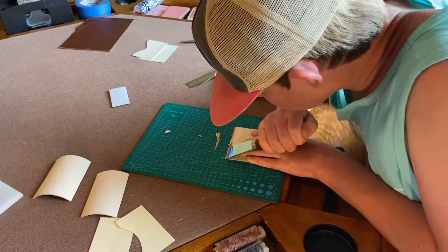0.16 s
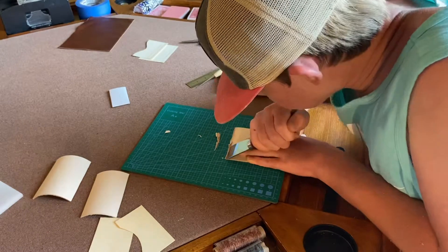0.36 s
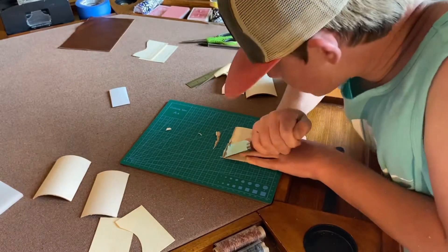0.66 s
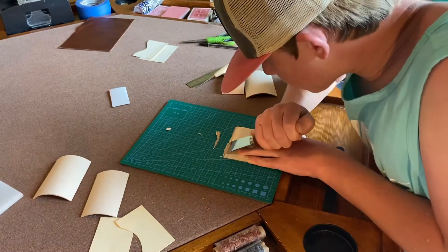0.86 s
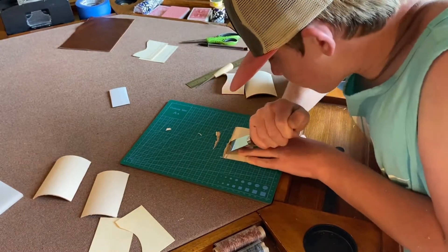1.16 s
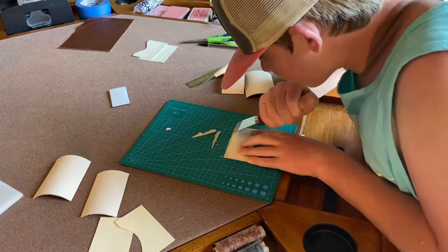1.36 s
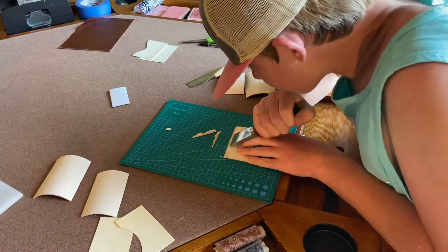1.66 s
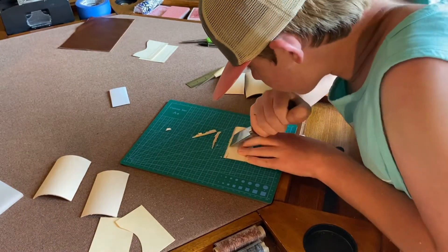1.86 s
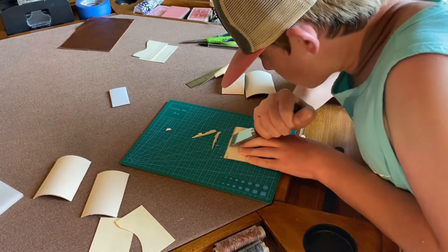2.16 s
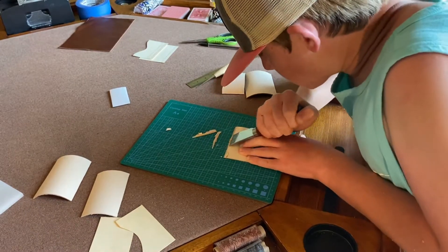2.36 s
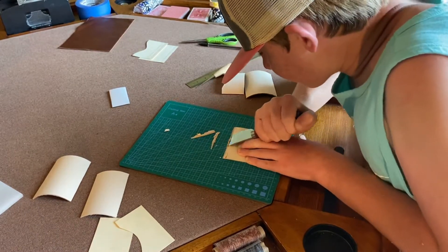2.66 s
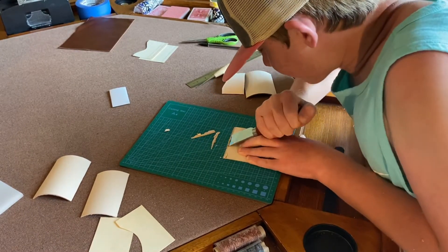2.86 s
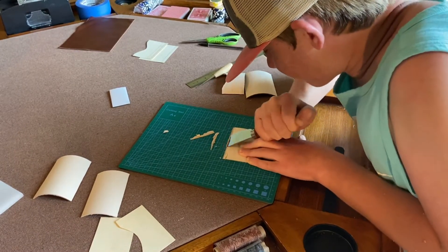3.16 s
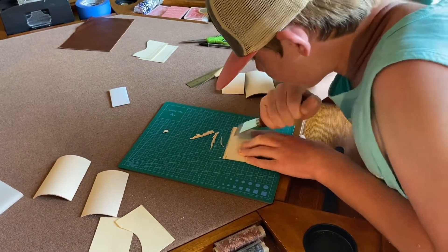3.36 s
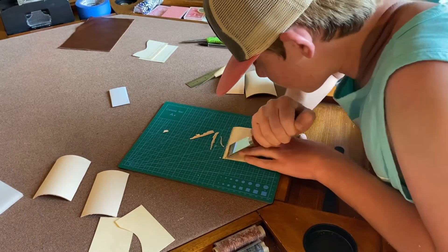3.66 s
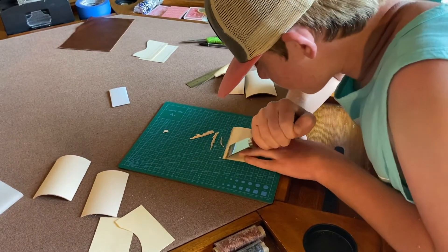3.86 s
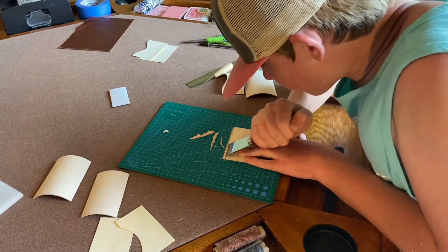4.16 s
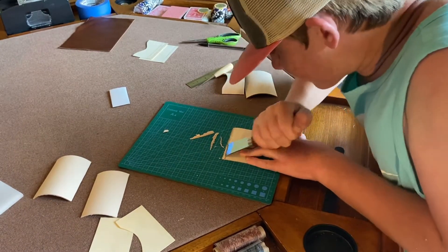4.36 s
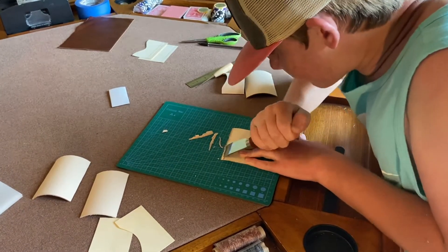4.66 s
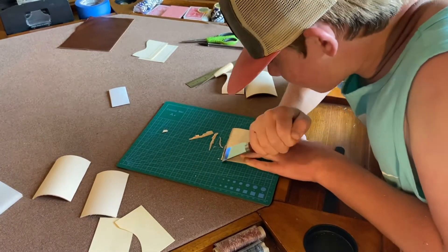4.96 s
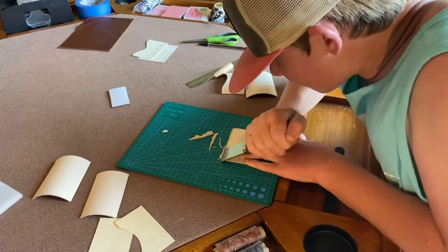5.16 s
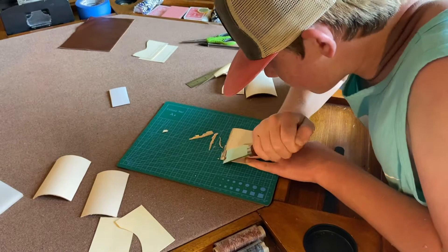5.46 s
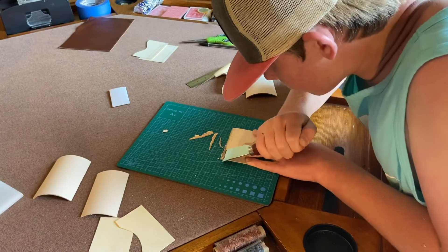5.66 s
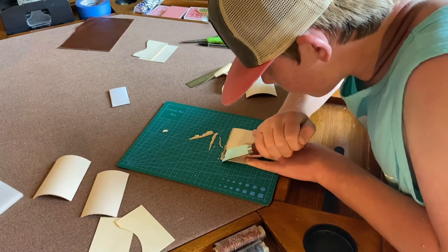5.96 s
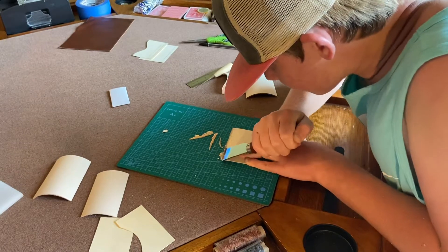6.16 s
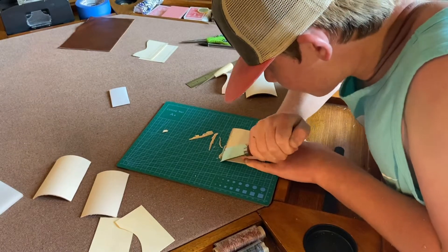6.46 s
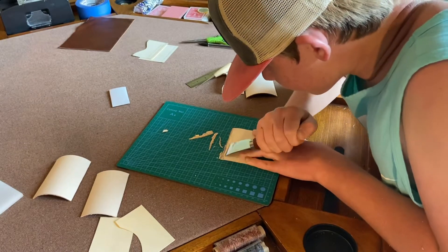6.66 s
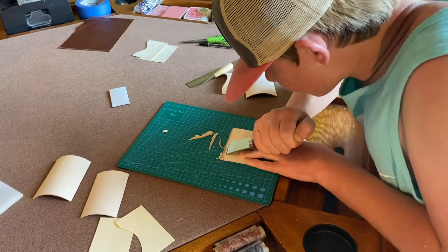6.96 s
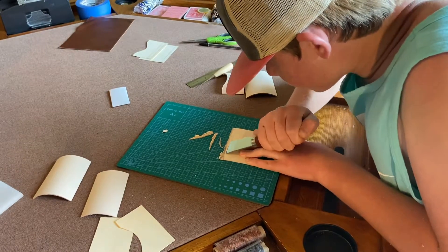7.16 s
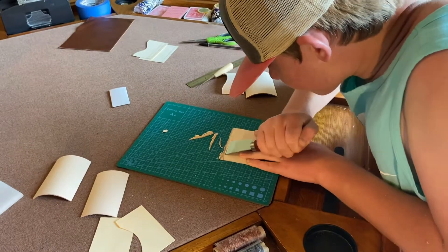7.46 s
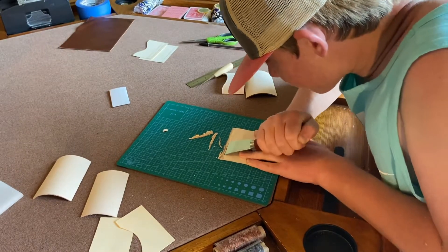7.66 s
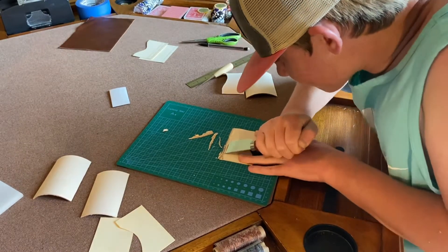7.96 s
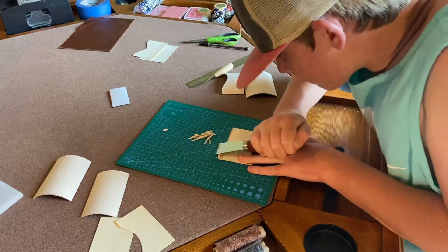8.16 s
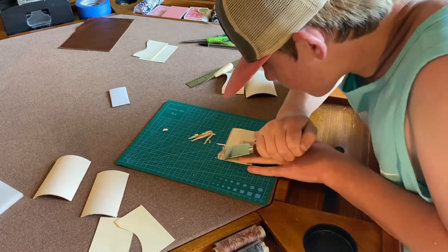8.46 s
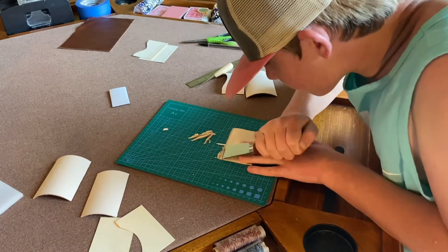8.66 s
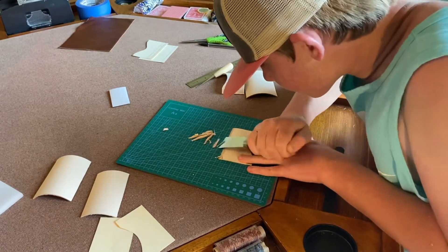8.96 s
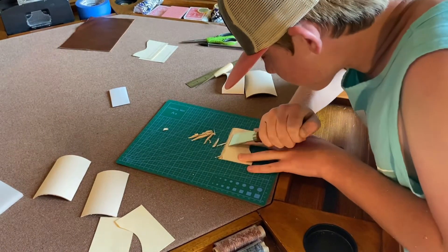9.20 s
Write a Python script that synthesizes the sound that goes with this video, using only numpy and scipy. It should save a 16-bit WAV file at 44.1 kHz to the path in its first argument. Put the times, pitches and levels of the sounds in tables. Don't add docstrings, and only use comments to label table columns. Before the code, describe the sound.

Stuttering scrapes of a blade through leather, small ticks, dull board knocks and a hard clack, over quiet room ventilation hum.

```python
import sys
import numpy as np
from scipy import signal
from scipy.fft import rfft, irfft, next_fast_len
from scipy.io import wavfile
from scipy.ndimage import uniform_filter1d

SR = 44100
rng = np.random.default_rng(int(sys.argv[2]) if len(sys.argv) > 2 else 0)


def to_linear_factor(level_db):
    exponent = np.asarray(level_db, float) / 20
    return 10 ** exponent


def generate_wav(signal):
    frames = np.transpose(np.atleast_2d(signal))
    scaled = np.clip(frames, -1, 1) * 32767
    pcm = np.round(scaled).astype(np.int16)
    wavfile.write(sys.argv[1], SR, pcm)


N = 411453
T = np.arange(N) / SR
FAST = next_fast_len(N, True)
HZ = np.maximum(np.fft.rfftfreq(FAST, 1 / SR), 10)

# frequency in Hz, level in dB per Hz.
AIR_COLOUR = [(18, -48), (30, -32), (165, 0), (226, -2), (279, -5), (447, -2.5), (716, -5.5), (795, -13),
              (883, -11), (1570, -16), (2520, -17.5), (4040, -27), (8420, -34), (12500, -42.5),
              (14600, -48.5), (15800, -50)]
# frequency in Hz, width in Hz, lift in dB
HUM_PEAKS_DIPS = [(91, 12.5, 6.5), (163.2, 14.6, 4), (214, 24, 7), (281, 25, -3.5), (356, 69, 5.5),
                  (451.7, 33.4, 7.5), (596, 23, 3.5), (892, 17, 4.5), (2600, 300, 2.5), (3050, 350, -3.5),
                  (4100, 200, -5)]
# frequency in Hz, left minus right in dB.
AIR_SIDE = [(200, 0.1), (290, 3), (380, 6), (520, 2), (700, 0.1)]
AIR_DB = -48.5

# start in seconds, hardest in seconds, end in seconds, lift of the drag in dB.
STROKES = [
    (.35, 0.648, 0.74, 2.5),
    (.8, 1.05, 1.3, 3),
    (2.2, 2.66, 2.91, 8.2),
    (2.9, 3.07, 3.15, 8),
    (3.0, 3.22, 3.57, 9.5),
    (3.9, 4.54, 4.78, 8.6),
    (4.9, 5.33, 5.55, 5),
    (5.7, 6.0, 6.2, 2),
    (6.25, 6.47, 6.68, 2),
]
# frequency in Hz, level in dB per Hz.
CUT_COLOUR = [(300, -26), (900, 3), (2500, -8), (5000, -15.5), (12000, -29.5)]
# frequency in Hz, level in dB per Hz.
RUSTLE_COLOUR = [(3000, -18), (7000, -5.5), (10000, -7.5), (15500, -6.5)]
# time in seconds, level in dB.
FIDGET = [(0, -75), (.34, -86), (.62, -74), (.85, -84), (2.28, -90), (2.44, -74), (2.65, -84), (3.03, -91),
          (3.17, -69.5), (3.45, -79.5), (3.95, -72.5), (4.26, -81), (4.48, -72), (6.4, -75), (7.0, -79),
          (8.8, -85), (9.02, -75), (9.33, -83)]
FAINT_FLOOR_DB, RASP_TOP_HZ = -59, 5500
RUSTLE_FOLLOWS = 0.57

# start in seconds, level in dB, rise in seconds, t60 in seconds.
FLICKS = [
    (7.4745, -52, 0.0011, 0.05),
    (8.848, -64, .001, 0.026),
    (0.151, -71, .01, 0.054),
    (4.9, -67, 0.011, 0.1),
]
# time in seconds, peak in
# dB, centre in Hz, dull pluck in dB.
TICKS = [(1.0156, -45, 4830, -43), (3.3882, -48, 4410, -58), (4.2283, -44, 4120, -55),
         (4.5451, -38, 5760, -46), (4.9048, -42, 4910, -58), (5.0464, -41, 4170, -46),
         (5.1103, -42, 5620, -40), (6.976, -44, 4340, -54), (7.1394, -59, 9080, -60),
         (7.656, -58, 8500, -62), (8.0311, -50, 5120, -46), (8.0739, -35, 10700, -44),
         (8.3294, -48, 8580, -61), (8.8478, -50, 11200, -65), (8.0742, -36, 15200, -60),
         (8.0742, -38, 6800, -60), (8.9012, -42, 8700, -55), (8.8672, -35, 9960, -47)]
# time in seconds, bright tick in dB, dull pluck in dB.
SPRINGS = [(2.3984, -53, -46), (2.4693, -45, -49), (2.5426, -50, -41), (2.601, -53, -43),
           (2.6584, -50, -44), (2.7207, -49, -39), (2.7741, -55, -55), (3.0974, -48, -42),
           (3.2091, -48, -35), (4.34, -44, -44), (4.4134, -51, -52), (4.4644, -42, -49), (4.5294, -47, -46),
           (4.5964, -59, -45), (4.6568, -38, -51)]
# frequency in Hz, level in dB per Hz.
FIZZ_COLOUR = [(2500, -20), (4500, -2), (8500, 0), (12000, -7), (15500, -14)]
SPRING_HZ = 9200

# time in seconds, peak in dB, pitch in Hz.
GRAINS = [(0.4469, -49, 1390), (1.1992, -42, 2100), (2.0637, -49, 1530), (2.2934, -43, 1820),
          (2.3254, -43, 1410), (2.3945, -43, 1640), (2.4374, -45, 1250), (2.4668, -43, 1560),
          (2.5032, -43, 1250), (2.5426, -41, 1650), (2.5701, -41, 1250), (2.602, -38, 1250),
          (2.6154, -40, 1290), (2.6838, -34, 1750), (2.6994, -43, 1610), (2.7192, -38, 1600),
          (2.7516, -40, 1360), (3.0041, -39, 1250), (3.0425, -39, 1370), (3.056, -35, 1700),
          (3.0664, -37, 1280), (3.0974, -37, 1570), (3.1218, -29, 1290), (3.1457, -32, 1330),
          (3.1824, -34, 2760), (3.2086, -35, 1580), (4.0886, -48, 1360), (4.1654, -42, 1250),
          (4.3071, -43, 2580), (4.3375, -39, 1570), (4.3755, -43, 1310), (4.4149, -40, 1310),
          (4.4444, -36, 1290), (4.4654, -40, 1640), (4.4854, -39, 2970), (4.5044, -39, 2790),
          (4.5124, -41, 1290), (4.5301, -39, 1330), (4.5625, -38, 1710), (4.5744, -39, 1250),
          (4.596, -37, 1530), (4.6254, -37, 1370), (4.6947, -42, 1340), (5.1816, -43, 1770),
          (5.243, -42, 1270), (5.4889, -47, 1370), (6.3594, -45, 1250), (7.0479, -43, 1320),
          (7.9668, -47, 1800)]

# time in seconds, peak in dB, crack in dB, contact in seconds.
KNOCKS = [(0.5660, -19, -30, 0.0028), (1.146, -30.5, -57, .007), (1.156, -22, -46, 0.0053),
          (3.14, -32, -57, 0.009), (3.18, -31.5, -55, 0.004), (3.24, -30, -58, 0.0015),
          (5.1117, -30.5, -51, 0.0022), (8.068, -36.5, -50, 0.008), (8.8644, -27, -36.5, 0.0037),
          (8.899, -38, -49, .004), (6.36, -43, -62, 0.014), (3.154, -31, -60, .006),
          (3.165, -33, -65, .012)]
# level in dB of the modes in each of the four groups,
# lowest first.
SPOTS = [(0.5, 2, -2.5, -1), (-4, -3, 6, 5), (3, -0.5, 3, 0.5), (1, 0.5, -3, -1), (1, -0.5, -1.5, -3.5),
         (1, 1, -3, -3), (-4.5, 1, 3, 3), (-2, -1, 5, 5.5), (-3, 2, 2, 1), (-2, -1, 1, -2), (5, 1, 2, 3),
         (4, 4, -2, -2), (11, -14, -14, -14)]
GROUP_TOPS_HZ = [220, 580, 950]
# frequency in Hz, width in Hz, level in dB.
BOARD_MODES = [(135, 13, -13.5), (180.4, 21, -6.5), (277, 37, -17), (309, 32, -10), (401, 26, -8),
               (440, 28, 0.5), (535, 30, -9), (635.5, 43, 0.5), (689, 58, -10), (843, 40, -9),
               (886, 39, -12), (1078, 54, -3.5), (1149, 52, -6.5), (1380, 63, -8), (1560, 80, -14.5)]
# frequency in Hz, width in Hz, level in dB.
TAP_MODES = [(1500, 400, 2.5), (2670, 360, 6.5), (5330, 590, -8.5), (9000, 2500, -19.5)]
KNOCK_FLOOR_HZ = 110

# start in seconds, peak in dB, rise in seconds, t60 in seconds,
# squeak of a leather scrap in dB.
BRUSHES = [
    (1.14, -34.5, 0.016, 0.06, -45),
    (1.196, -49, 0.0048, 0.05, -50),
    (3.03, -48, 0.0087, 0.047, -63),
    (8.06, -37.5, 0.017, .09, -50),
    (8.10, -42, .014, 0.028, -44),
    (8.867, -39.5, 0.0017, .08, -52),
    (8.899, -43.5, .004, 0.055, -61),
]
# frequency in Hz, level in dB per Hz.
BRUSH_COLOUR = [(710, -26), (1200, -3), (1770, -17), (2750, -5.5), (3640, -16.5), (3970, -13.5),
                (10800, -19.5), (12200, -28.5), (15800, -15)]
SQUEAK_HZ = 2140

# time in seconds, tear in dB, fibre hiss in dB, tip ring in dB.
SLIPS = [(1.924, -39.5, -59, -76), (2.1624, -44.5, -74, -84), (2.2399, -46, -60, -66),
         (2.3125, -40.5, -60, -59), (2.382, -44, -59, -64), (2.4376, -47, -63, -70),
         (2.5025, -46, -60, -65), (2.5701, -42, -58, -69), (2.6296, -40, -55.5, -57),
         (2.6855, -37.5, -58, -57), (2.7505, -41.5, -61, -60), (3.003, -43, -71, -74),
         (3.058, -35, -66, -69), (3.1198, -31, -50.5, -56), (3.176, -34.5, -47, -57),
         (4.024, -44.5, -74, -84), (4.162, -42.5, -59.5, -80), (4.239, -44, -61, -72),
         (4.3071, -43, -66, -69), (4.3755, -44, -56, -70), (4.4377, -41, -56, -63),
         (4.4844, -39.5, -57.5, -66), (4.5024, -44, -51, -60), (4.5606, -37.5, -51, -59),
         (4.6234, -35, -55, -63), (4.693, -40.5, -68, -80), (5.1816, -40, -62, -73), (5.245, -39, -60, -73),
         (6.3354, -45.5, -59, -77), (7.0404, -45, -65, -78)]
# extra ring of the blade body in dB, delay of the tear in seconds.
BITES = [(0.5, .002), (1, .002), (1, .002), (2, .006), (0.5, .009), (4, .002), (-2, .002), (3, .001),
         (-2, .004), (-2, .001), (0.5, .001), (3, .001), (2, .004), (3, .002), (1, .003), (1, .002),
         (1, .002), (3, .002), (1, .001), (2, .001), (-1, .005), (-3, .006), (-2, .002), (-2, .001),
         (-2, .002), (-3, .003), (-2, .004), (-2, .003), (1, .002), (1, .004)]
# time in seconds, tear in dB, fibre hiss in dB, tip ring in dB.
CATCHES = [
    (2.9744, -50, -70, -80),
    (3.037, -46, -62, -76),
    (5.3103, -45, -68, -79),
    (5.488, -45, -74, -84),
    (6.03, -48, -64, -82),
    (6.972, -48, -70, -84),
    (7.9, -48, -70, -86),
    (7.96, -48, -72, -86),
    (8.485, -48, -68, -86),
]
# frequency in Hz, level in dB per Hz.
LEATHER_COLOUR = [(600, -39), (1000, 5.5), (1600, 2), (3000, -1.5), (4500, -13), (8000, -39)]
# frequency in Hz, level in dB per Hz.
HISS_COLOUR = [(2500, -6), (4000, -2), (7000, -2.5), (9500, -13), (15500, -18)]
# frequency in Hz, width in Hz, level in dB.
TIP_MODES = [(14400, 210, -1.5), (13900, 250, -12)]
# frequency in Hz, width in Hz, level in dB.
STEEL_MODES = [(5730, 120, 8.3), (3290, 160, 8.5), (2160, 90, 7), (2760, 140, 8), (4370, 180, 2),
               (5080, 200, 1), (1700, 120, 2), (6400, 250, -3)]
FIRM_RING_DB, FIRM_TEAR_DB = -62, -42
BODY_DB, BODY_FOLLOWS_TIP, BODY_FOLLOWS_TEAR = -58.5, .5, .4
JERK_T60_S, T60_S_PER_DB = .1, 0.0041

# time in seconds, click in dB, rattle in dB, t60 in seconds.
SNAPS = [
    (3.234, -36.5, -32, 0.094),
    (3.2399, -9, -18.5, 0.06),
    (3.2723, -16.5, -30.5, 0.09),
    (3.2765, -21, -30, 0.068),
    (3.2855, -29, -36.5, 0.055),
    (3.297, -33, -40, 0.055),
    (3.3162, -34, -38, 0.07),
]
# frequency in Hz, level in dB per Hz.
RATTLE_COLOUR = [(290, -35), (500, -12), (545, -16), (931, -6.5), (1520, -6), (1660, 1), (1940, -23),
                 (2450, -1), (3470, -7.5), (3830, -3.5), (4760, -6.5), (5750, -4), (8130, -17),
                 (10400, -29.5), (15800, -26)]
# frequency in Hz, width in Hz, level in dB.
CRACK_MODES = [(1690, 200, -3), (2620, 350, 1.5), (3830, 390, 2), (5580, 550, 0), (7840, 630, -3.5)]

# frequency in Hz, left-right likeness from -1 to 1.
FAR_LIKENESS = [(30, .75), (60, .97), (110, 0.95), (200, 0.97), (380, 0.65), (700, 0.93), (1290, -0.15),
                (2380, -0.35), (4400, -0.48), (8120, 0.59), (15000, 0.18)]
# frequency in Hz, left-right likeness from -1 to 1.
NEAR_LIKENESS = [(130, 0.89), (600, 0.74), (1400, 0.57), (3000, 0.26), (4300, 0.065), (6000, 0.1),
                 (9500, 0.62), (14000, 0.4), (15500, 0.053)]
# frequency in Hz, left minus right in dB.
PORTS = [(60, 1), (110, 2), (200, -0.5), (380, 2.5), (700, 1.5), (1290, 4.0), (2380, 4.5), (4400, 1.5),
         (8120, 3.5), (15000, 7.5)]
# low edge in Hz, high edge in Hz, rarity in spreads of chance,
# changes per second.
DROPOUTS = [(3980, 4160, .9, 12), (4350, 4500, 1.6, 12), (5000, 5170, 1.8, 12), (10050, 10250, 1.3, 12),
            (11600, 11850, 1.6, 12), (13200, 13450, 1.4, 12), (15300, 15800, 1.0, 10),
            (14750, 15300, 1.5, 10)]
ROOM_T60_S, ROOM_DB = 0.12, -12.5
BASS_CUT_HZ, TOP_CUT_HZ = 59, 15760


def rms_one(x):
    return x / np.sqrt(np.mean(x ** 2) + 1e-20)


def at_hz(points):
    hz, value = np.transpose(points)
    return np.interp(np.log(HZ), np.log(hz), value)


def drift(rate_hz):
    r = np.exp(-2 * np.pi * rate_hz / SR)
    slow = signal.lfilter([1], [1, -2 * r, r * r], rng.standard_normal(N + SR))
    return rms_one(slow[SR:])


def noise(colour_db, likeness, pan_db=0):
    mid, side = rfft(rng.standard_normal((2, FAST))) * to_linear_factor(colour_db)
    alike = np.clip(at_hz(likeness), -.99, .99)
    pair = np.sqrt(1 + alike) * mid + np.sqrt(1 - alike) * side * [[1], [-1]]
    pair = pair * to_linear_factor(pan_db * np.array([[.5], [-.5]]))
    pair = irfft(pair, FAST)[:, :N]
    return pair / np.std(pair.mean(axis=0))


def envelope(rows):
    out = np.full(N, 1e-9)
    t = np.arange(SR // 2) / SR
    for s, level_db, rise, t60 in rows:
        rise = max(rise, 1e-4)
        fall_db = -60 * np.maximum(t - rise, 0) / t60
        shape = np.minimum(t / rise, 1) * to_linear_factor(level_db + fall_db)
        at = round(s * SR)
        out[at:at + len(t)] += shape[:N - at]
    return out


def resonate(x, hz, width_hz):
    r = np.exp(-np.pi * width_hz / SR)
    poles = [1, -2 * r * np.cos(2 * np.pi * hz / SR), r * r]
    return signal.lfilter(np.array([1, 0, -1]) * (1 - r * r) / 2, poles, x)


def modes(x, table):
    return sum((-1) ** k * to_linear_factor(mode_db) * resonate(x, hz, width) for k, (hz, width, mode_db) in enumerate(table))


def strikes(times, levels_db, lag):
    clicks = np.full((2, N), 1e-18)
    at = np.round(np.array(times) * SR).astype(int)
    clicks[0, at] = clicks[1, at + lag] = to_linear_factor(np.array(levels_db))
    return clicks


def air_unit():
    modes_db = sum(mode_db / (1 + (2 * (HZ - hz) / width) ** 2) for hz, width, mode_db in HUM_PEAKS_DIPS)
    hum = noise(at_hz(AIR_COLOUR) + modes_db, FAR_LIKENESS, at_hz(AIR_SIDE))
    return hum * to_linear_factor(AIR_DB + .9 * drift(4))


def friction():
    pushes = [np.interp(T, [start, hardest, end], [0, lift_db, 0]) for start, hardest, end, lift_db in STROKES]
    push_db = np.max(pushes, axis=0)
    effort = to_linear_factor(FAINT_FLOOR_DB + push_db)
    crackles_per_s = 400 * (effort / to_linear_factor(-54)) ** 2
    crackle = (rng.random(N) < crackles_per_s / SR) * to_linear_factor(2.4 * np.minimum(rng.exponential(1, N), 3))
    crackle = signal.lfilter([1], [1, -np.exp(-1 / (0.0007 * SR))], crackle)
    cut = noise(at_hz(CUT_COLOUR), NEAR_LIKENESS) * effort * to_linear_factor(-5.7 + 2.3 * drift(25))
    cut = cut * (0.84 + .8 * crackle)
    cut = signal.sosfilt(signal.butter(4, RASP_TOP_HZ, fs=SR, output="sos"), cut)
    rustle_db = np.interp(T, *np.transpose(FIDGET)) + RUSTLE_FOLLOWS * push_db
    return cut + noise(at_hz(RUSTLE_COLOUR), NEAR_LIKENESS) * to_linear_factor(rustle_db + 2.6 * drift(15))


def fibres():
    clicks, t = np.zeros(N), np.arange(400) / SR
    ticks = TICKS + [(s, level_db, SPRING_HZ, pluck_db) for s, level_db, pluck_db in SPRINGS]
    for s, level_db, hz, pluck_db in ticks:
        click = to_linear_factor(level_db + 6) * np.sin(2 * np.pi * hz * t) * t * hz * np.exp(-t * hz / .85)
        pluck = to_linear_factor(pluck_db - 1.2) * np.sin(2 * np.pi * 1800 * t) * to_linear_factor(-60 * t / 0.012)
        clicks[round((s + .001) * SR):][:len(t)] += click + pluck
    fizz = envelope([(s + 0.00095, level_db - 15.5, .0002, .015) for s, level_db, _, _ in ticks] + FLICKS)
    return clicks + fizz * noise(at_hz(FIZZ_COLOUR), NEAR_LIKENESS)


def tough_grains():
    out, t = np.zeros((2, N)), np.arange(500) / SR
    for s, level_db, hz in GRAINS:
        turn = 2 * np.pi * hz * (t + np.array([[0], [-5e-5]]))
        ring = np.sin(turn) + .6 * np.sin(1.58 * turn)
        ring = ring * np.minimum(t / .0006, 1) * to_linear_factor(level_db - .3 - 60 * t / .013)
        at = round(s * SR)
        out[:, at:at + len(t)] += ring
    return out


def knocks():
    out, t = np.full((2, N), 1e-18), np.arange(SR // 4) / SR
    chance = rng.standard_normal((len(KNOCKS), len(BOARD_MODES), 3))
    for (s, level_db, _, contact), spot_db, draws in zip(KNOCKS, SPOTS, chance):
        at = round(s * SR)
        for (hz, width, mode_db), (own, phase, apart) in zip(BOARD_MODES, draws):
            group_db = spot_db[np.searchsorted(GROUP_TOPS_HZ, hz)]
            swell = np.minimum(t / contact, 1) * np.exp(-np.pi * width * np.maximum(t - contact, 0))
            turn = 3 * phase + apart * hz / 3500 * np.array([[.5], [-.5]])
            strength = to_linear_factor(level_db + group_db + mode_db - 7.5 + 0.63 * own)
            out[:, at:at + len(t)] += strength * swell * np.sin(2 * np.pi * hz * t + turn)
    out = signal.sosfilt(signal.butter(2, KNOCK_FLOOR_HZ, "high", fs=SR, output="sos"), out)
    s, _, crack_db, _ = np.transpose(KNOCKS)
    scrape = noise(0 * HZ, NEAR_LIKENESS) * envelope(zip(s, crack_db + 2.5, 0 * s, 0.048 + 0 * s))
    crack = strikes(s, crack_db + 24.0, lag=1) + scrape
    return out + modes(crack, TAP_MODES)


def brushes():
    s, level_db, rise, t60, squeak_db = np.transpose(BRUSHES)
    sweep = noise(at_hz(BRUSH_COLOUR), NEAR_LIKENESS) * to_linear_factor(2.4 * drift(250))
    scrap = rng.standard_normal(N) * envelope(zip(s, squeak_db + 20, rise, t60))
    squeak = resonate(scrap, SQUEAK_HZ, 113)
    return sweep * envelope(zip(s, level_db - 6, rise, t60)) + squeak


def blade():
    s, leather_db, hiss_db, tip_db = np.transpose(SLIPS + CATCHES)
    lift_db, lag = np.transpose(BITES + [(0, 0)] * len(CATCHES))
    ring_swing_db, tear_swing_db = tip_db - FIRM_RING_DB, leather_db - FIRM_TEAR_DB
    steel_db = lift_db + BODY_DB + BODY_FOLLOWS_TIP * ring_swing_db + BODY_FOLLOWS_TEAR * tear_swing_db
    t60 = JERK_T60_S + T60_S_PER_DB * ring_swing_db
    grain = to_linear_factor(3.0 * drift(340))
    tear = envelope(zip(s + lag, leather_db - 9.3, 0.0045 + 0 * s, .9 * t60))
    tear = tear * noise(at_hz(LEATHER_COLOUR), NEAR_LIKENESS)
    hiss = envelope(zip(s, hiss_db, 0.0023 + 0 * s, 0.93 * t60)) * noise(at_hz(HISS_COLOUR), NEAR_LIKENESS)
    white = rng.standard_normal((2, N))
    tip = white * envelope(zip(s, tip_db + 17, .002 + 0 * s, .65 * t60))
    tip = tip + strikes(s + .002, tip_db + 40, lag=0)
    steel = white * envelope(zip(s, steel_db + 13, 0.0015 + 0 * s, .65 * t60))
    steel = steel + strikes(s + 0.000994, steel_db + 26.5, lag=0)
    return (tear + hiss) * grain + modes(tip, TIP_MODES) + modes(steel, STEEL_MODES)


def snaps():
    s, click_db, rattle_db, t60 = np.transpose(SNAPS)
    rattle = envelope(zip(s, rattle_db, 0.00082 + 0 * s, t60)) * to_linear_factor(1.3 * drift(400))
    click = modes(strikes(s, click_db + 22, lag=1), CRACK_MODES)
    return click + noise(at_hz(RATTLE_COLOUR), NEAR_LIKENESS) * rattle


def room(x):
    t = np.arange(SR // 2) / SR
    tail = rng.standard_normal((2, len(t))) * to_linear_factor(-60 * t / ROOM_T60_S) * (t > .004)
    tail = signal.lfilter([.5], [1, -.5], tail)
    bass = signal.lfilter(*signal.butter(1, 900, fs=SR), tail)
    tail = tail - bass + bass[0]
    tail = tail / np.sqrt(np.sum(tail ** 2, axis=1, keepdims=True))
    return to_linear_factor(ROOM_DB) * signal.fftconvolve(x.mean(axis=0)[None], tail, axes=1)[:, :N]


def scene():
    work = fibres() + tough_grains() + knocks() + brushes() + blade() + snaps()
    return air_unit() + friction() + work + room(work)


def dropouts(x):
    spectrum = rfft(x, FAST)
    for low, high, rarity, rate in DROPOUTS:
        gate = uniform_filter1d(1. * (drift(rate) > rarity), size=700)
        band = irfft(spectrum * ((HZ > low) & (HZ < high)), FAST)[:, :N]
        x = x - gate * band
    return x


def low_pass(x):
    return signal.sosfilt(signal.butter(12, 16630, fs=SR, output="sos"), x)


def record(dry):
    tilt = to_linear_factor(at_hz(PORTS) / 2 * np.array([[1], [-1]])) * (HZ < TOP_CUT_HZ)
    mix = irfft(rfft(dry, FAST) * tilt, FAST)[:, :N]
    mix = signal.sosfilt(signal.butter(2, BASS_CUT_HZ, "high", fs=SR, output="sos"), mix)
    mix = dropouts(mix)
    return low_pass(mix)


dry = scene()
out = record(dry)
generate_wav(out)
```